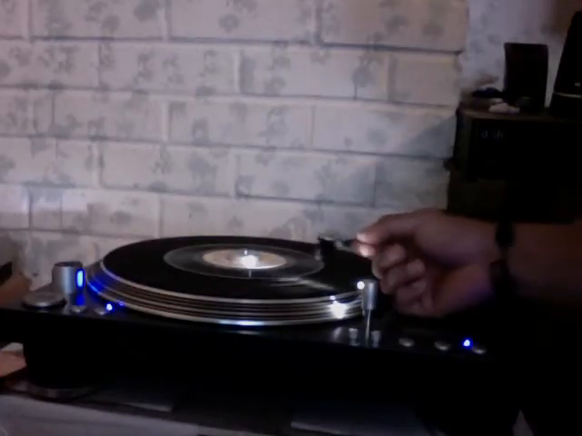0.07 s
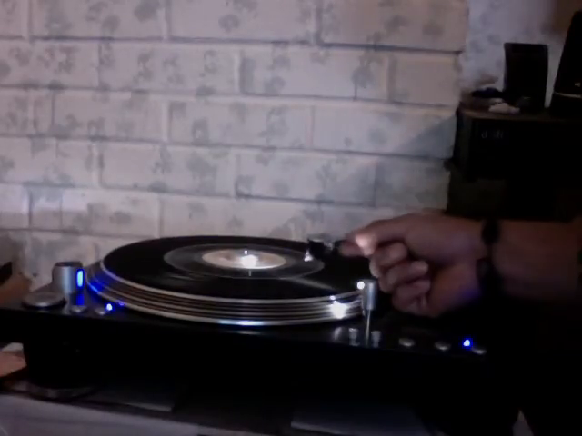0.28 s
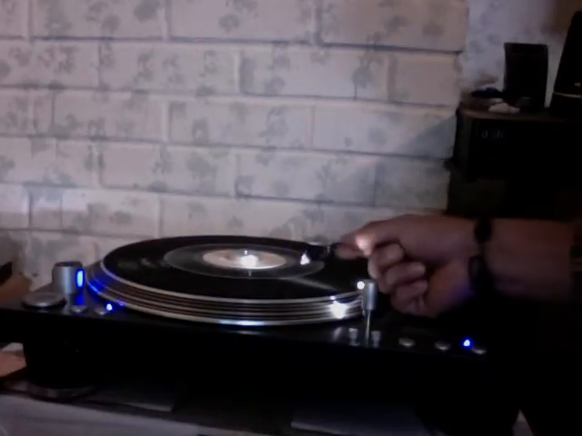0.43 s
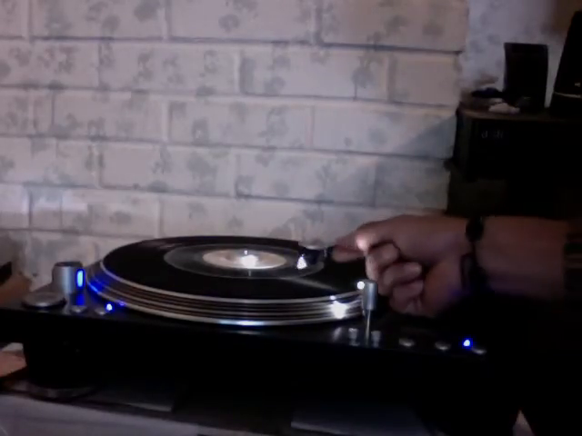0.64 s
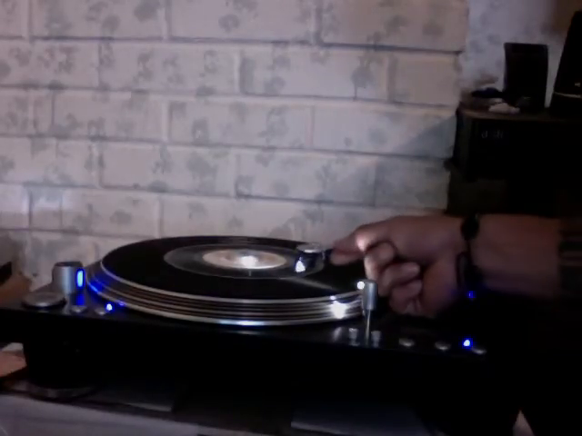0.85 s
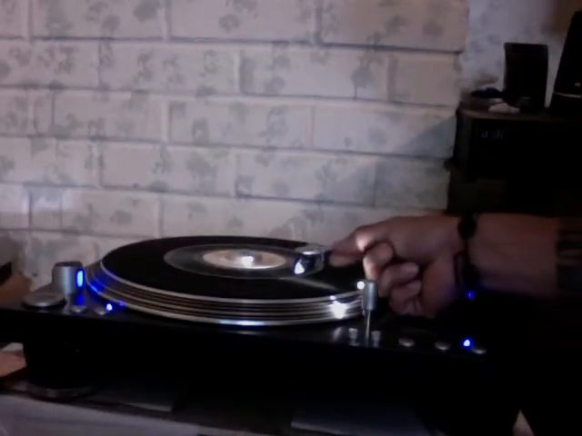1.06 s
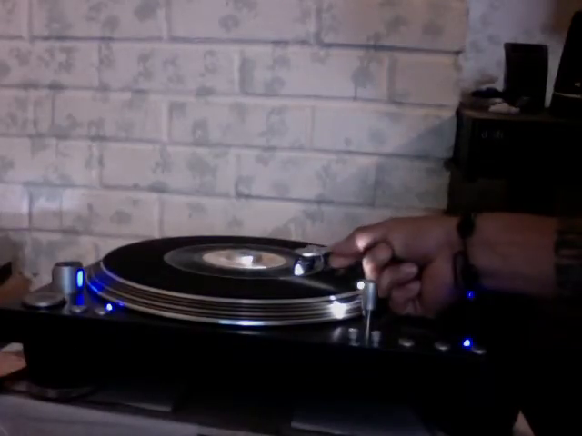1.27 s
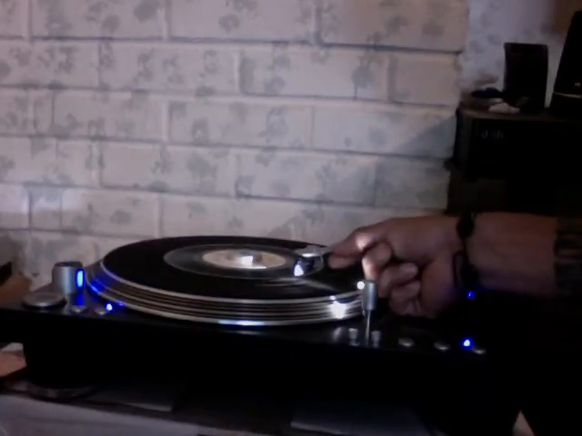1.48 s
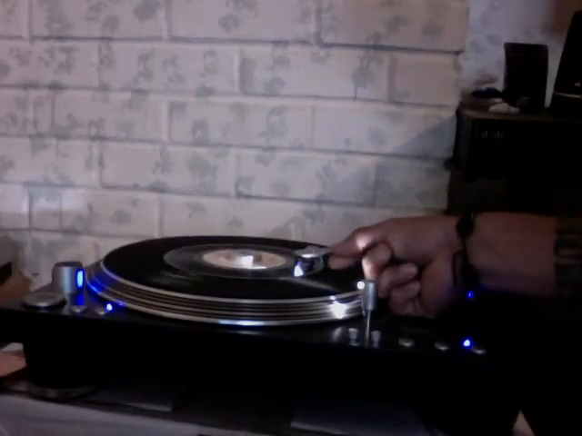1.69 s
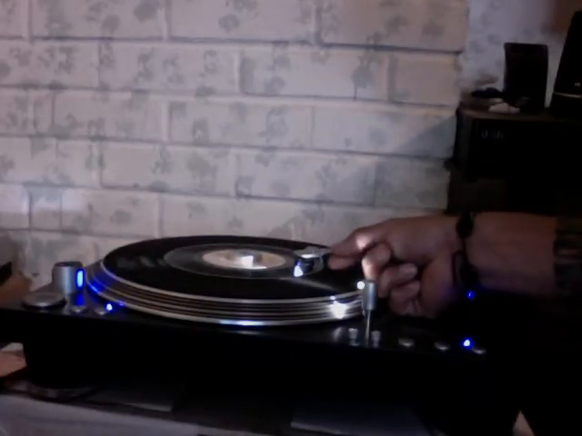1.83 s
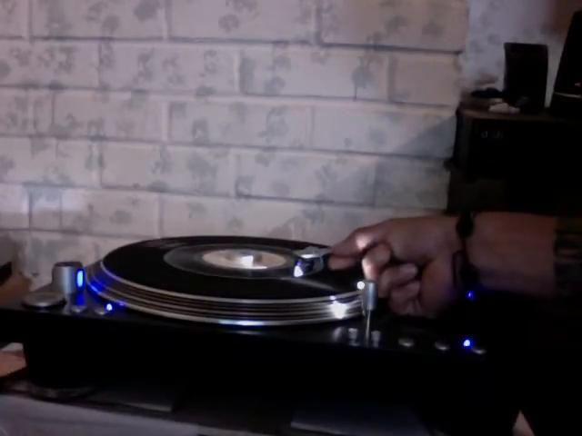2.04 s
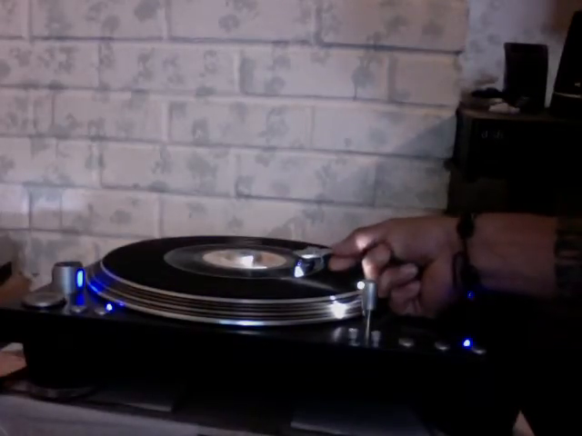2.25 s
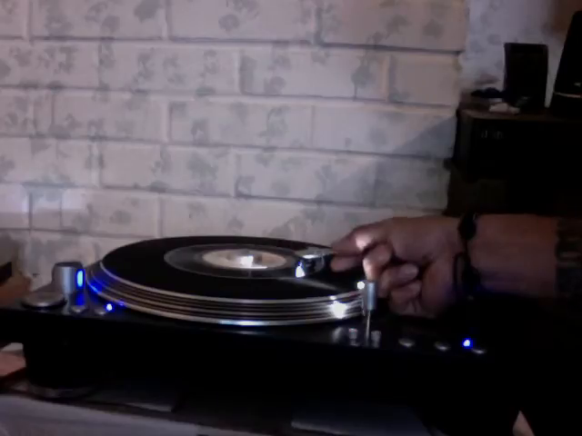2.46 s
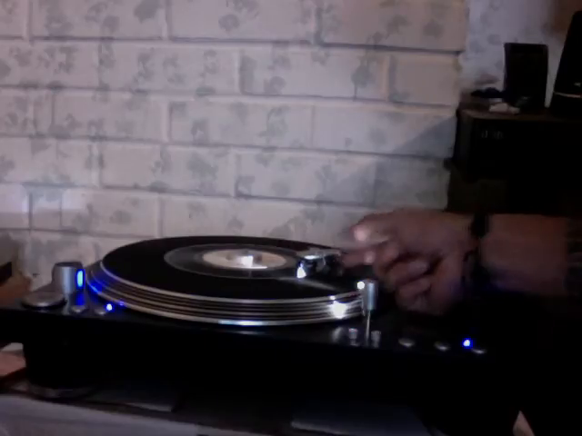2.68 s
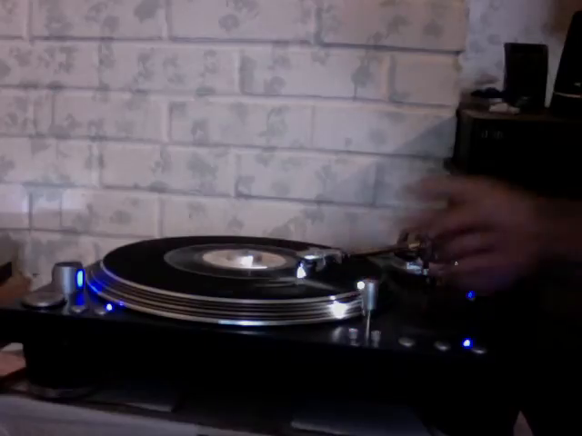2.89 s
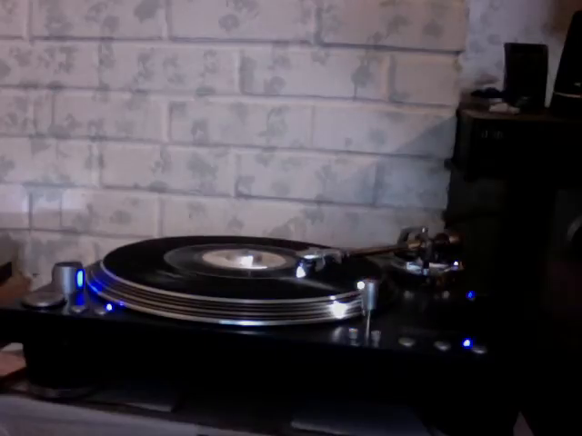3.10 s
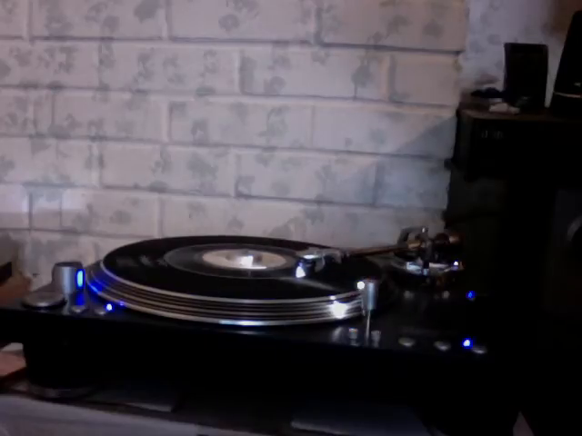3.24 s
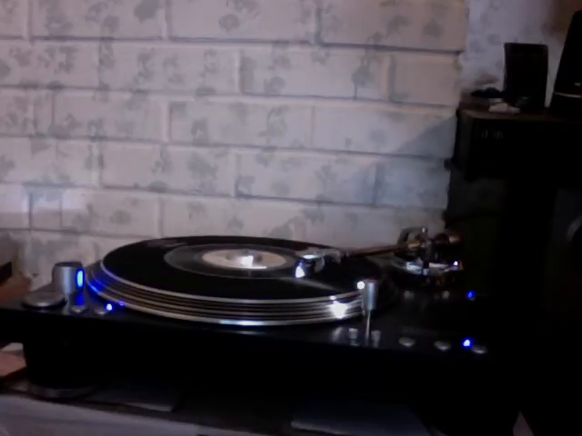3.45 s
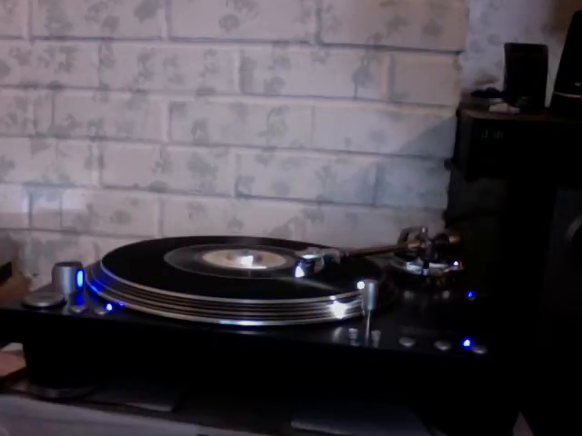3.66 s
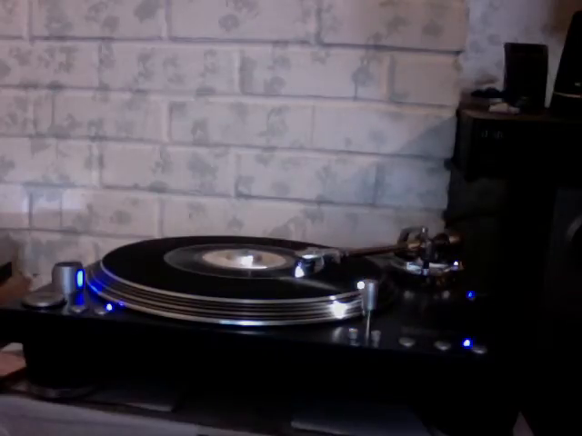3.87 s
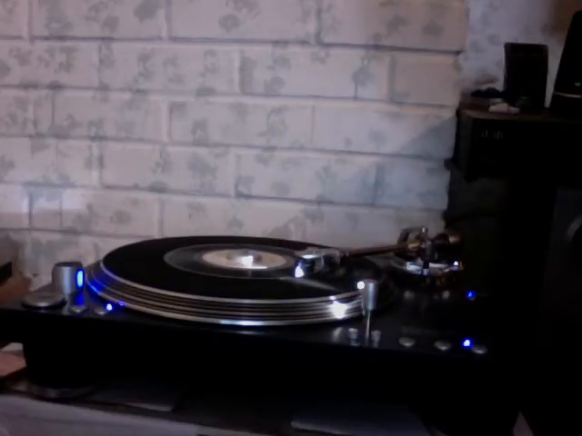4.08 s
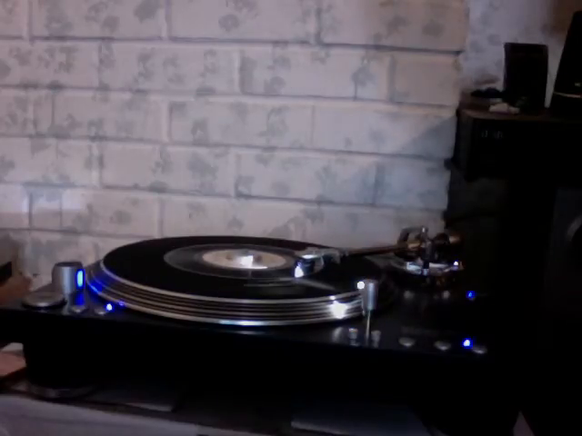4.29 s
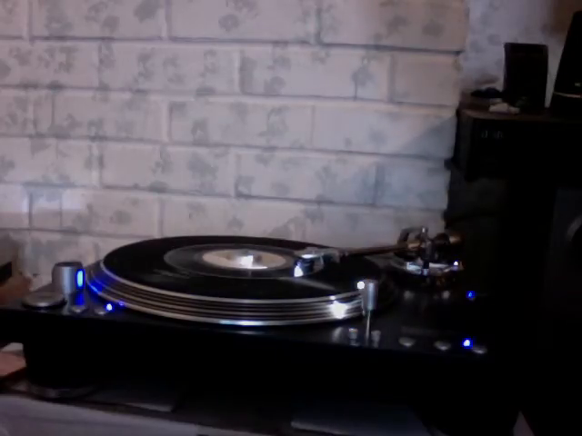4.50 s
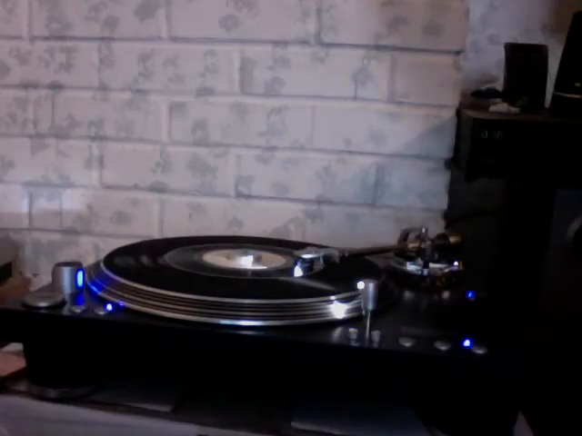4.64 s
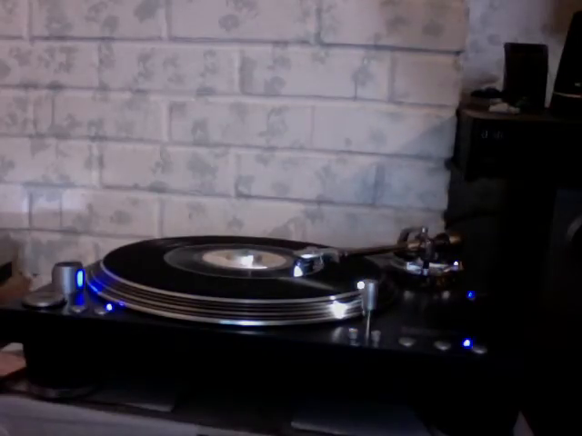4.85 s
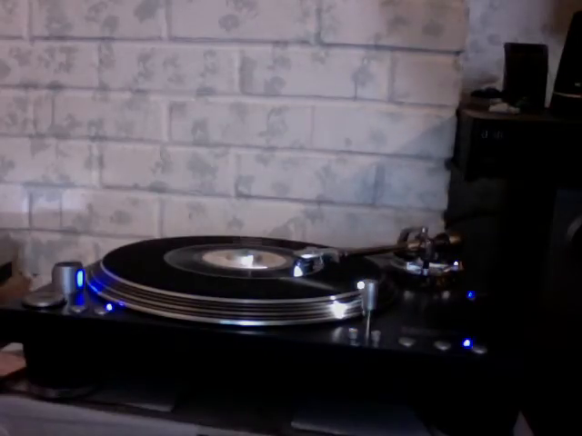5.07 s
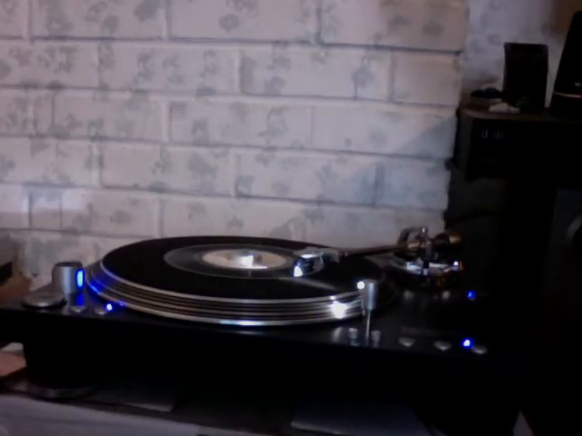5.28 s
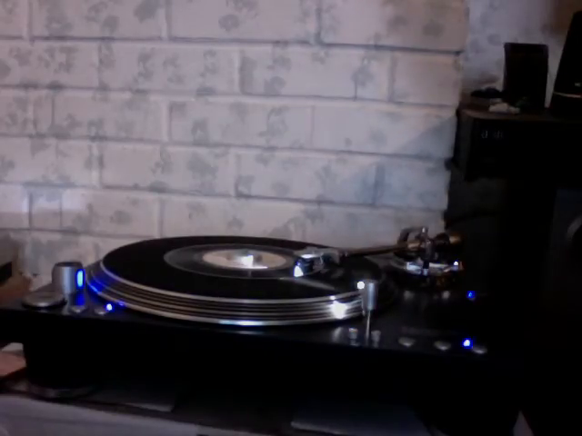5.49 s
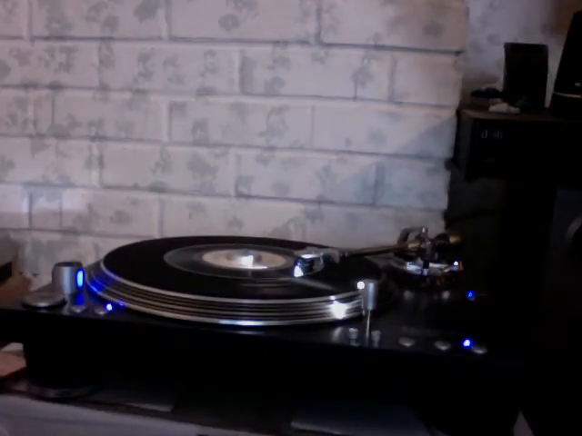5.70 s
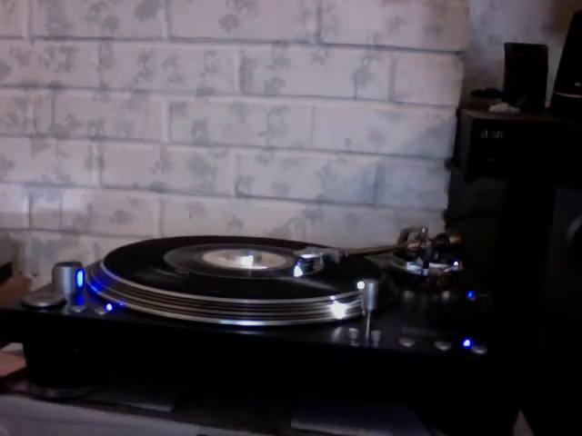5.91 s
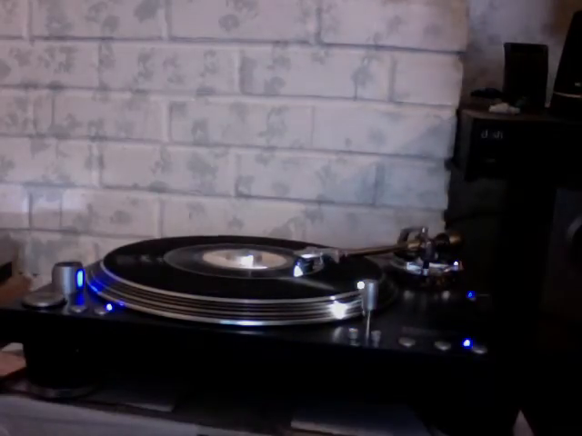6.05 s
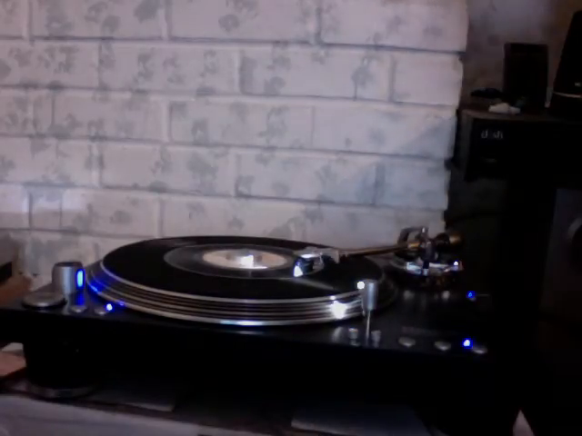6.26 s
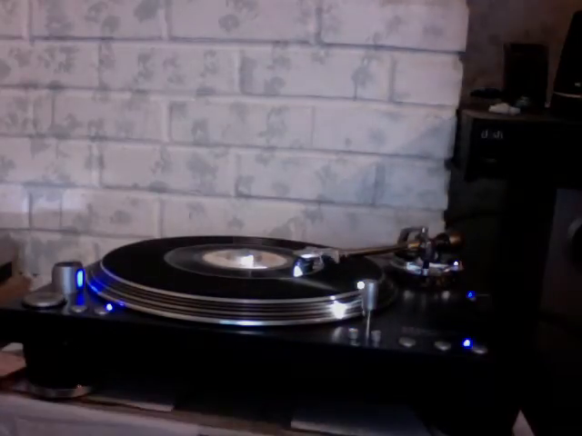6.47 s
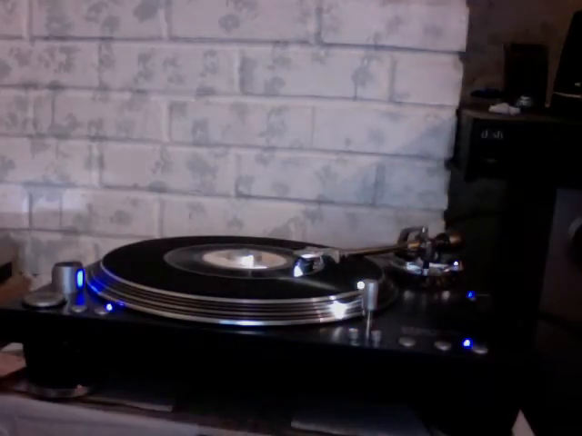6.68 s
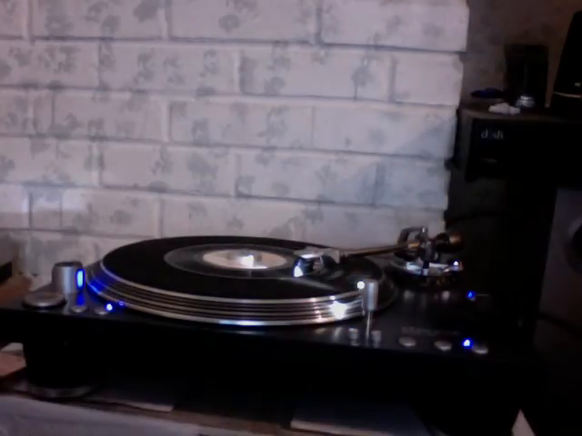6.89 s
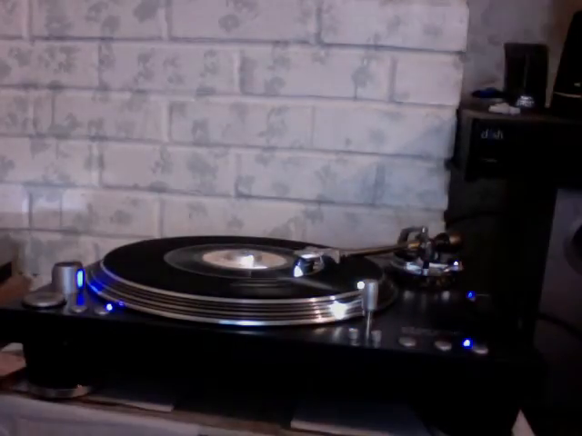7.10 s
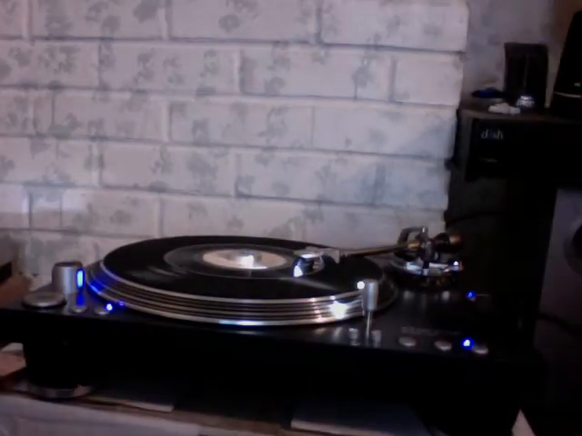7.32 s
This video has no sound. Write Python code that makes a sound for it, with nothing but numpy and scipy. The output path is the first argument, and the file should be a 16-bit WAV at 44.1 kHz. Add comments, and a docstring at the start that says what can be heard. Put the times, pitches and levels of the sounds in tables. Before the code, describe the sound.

A direct, dry pickup of a record player, nearly all in the left channel, with only a thin, bright trace of the pops on the right. From 0 to 1.7 s there is just faint 60 Hz hum, slight buzz and soft hiss, with tiny dips near 1.0, 1.3 and 1.45 s. At about 1.73 s the stylus touches dusty spinning vinyl: crackle and ticks, a heavy thump at 1.86, a harder one at 2.3, and a duller knock at 2.63 s. Loud, sharp pops crowd 2.6-2.8 and 3.05-3.2 s. After 3.3 s crackle thins over dull surface noise and deep rumble that swells with each 1.4-second turn. Strong isolated pops strike around 4.47, 4.66, 5.58 and 5.71 s; then lighter, sparse clicks continue. From 6.5 s a faint low groove hum joins until the end at 7.3 s.

```python
"""At a record player: a stylus is lowered by hand onto a dusty spinning record, wired into a recorder's left input.
Grains and pits kick the stylus, which makes the pops and crackle; wide pushes on a springy arm make thumps and knocks.
The vinyl rumbles and hisses as filtered noise, with a low hum of sines cut in the groove.
Below lie the hum, buzz and hiss of the phono stage; a trace of it all leaks into the right input."""
import sys
import numpy as np
from scipy import signal
from scipy.fft import rfft, irfft, next_fast_len
from scipy.io import wavfile

SR = 44100
rng = np.random.default_rng(int(sys.argv[2]) if len(sys.argv) > 2 else 0)


def inscribe(sig):
    """Save sig as 16-bit PCM at rate SR to the path in sys.argv[1].

    A 1-D sig is mono; a 2-D sig holds one channel per row.
    Samples are clipped to [-1, 1] before scaling.
    """
    pcm = np.round(np.clip(np.atleast_2d(sig).T, -1, 1) * 32767)
    wavfile.write(sys.argv[1], SR, pcm.astype(np.int16))


N = 323584   # length in samples

# All levels below are those ahead of the recorder's input gain.
# Loud pops where a grain pushes the stylus out.
# Each row: time in seconds, peak in dB, push in ms, slip back in ms.
GRAIN_POPS = [(1.7457, -12.5, 0.32, 0.056), (1.758, -26, 0.12, 0.11), (1.7742, -21, 0.065, 0.024),
              (1.811, -23, 0.041, 0.34), (1.8207, -10.5, 0.035, 0.13), (1.825, -17, 0.077, 0.03),
              (1.8334, -16, 0.065, 0.082), (1.8367, -20, 0.036, 0.13), (1.8664, -5.5, 0.058, 0.067),
              (1.901, -17.5, 0.043, 0.027), (1.936, -19, 0.019, 0.013), (1.994, -12.5, 0.026, 0.091),
              (2.067, -12.5, 0.034, 0.024), (2.1044, -17.5, 0.03, 0.02), (2.3937, -17, 0.027, 0.094),
              (2.4697, -16.5, 0.021, 0.048), (2.4692, -15.5, 0.027, 0.12), (2.4715, -11.5, 0.054, 0.061),
              (2.6153, -6, 0.036, 0.061), (2.6277, -12, 0.39, 0.4), (2.6463, -5, 0.077, 0.068),
              (2.679, -12.5, 0.081, 0.027), (2.6863, -14, 0.066, 0.074), (2.7218, -8.5, 0.054, 0.051),
              (2.725, -15, 0.09, 0.03), (2.779, -17, 0.073, 0.058), (2.7891, -8, 0.067, 0.081),
              (2.7933, -5, 0.17, 0.42), (2.7949, -6, 0.052, 0.096), (2.7963, -8, 0.07, 0.042),
              (2.8013, -12, 0.065, 0.35), (2.807, -7, 0.043, 0.18), (2.8576, -15.5, 0.09, 0.078),
              (2.885, -22.5, 0.3, 0.1), (2.9039, -20.5, 0.18, 0.044), (3.0132, -16, 0.13, 0.09),
              (3.0491, -10, 0.2, 0.05), (3.0647, -13.5, 0.055, 0.19), (3.0802, -20, 0.065, 0.067),
              (3.081, -14, 0.11, 0.066), (3.096, -11.5, 0.094, 0.094), (3.1007, -14.5, 0.12, 0.065),
              (3.1235, -7.5, 0.076, 0.19), (3.1366, -12.5, 0.061, 0.016), (3.1549, -10.5, 0.07, 0.18),
              (3.178, -2.5, 0.17, 0.12), (3.1837, -10, 0.21, 0.017), (3.1877, -7.5, 0.021, 0.16),
              (3.194, -10, 0.51, 0.039), (3.2106, -12.5, 0.067, 0.51), (3.2113, -10.5, 0.077, 0.11),
              (3.2312, -18, 0.15, 0.065), (3.286, -20, 0.11, 0.19), (3.2917, -19, 0.24, 0.18),
              (3.3005, -17.5, 0.095, 0.12), (3.3164, -16.5, 0.28, 0.099), (3.3228, -16.5, 0.46, 0.16),
              (3.369, -21.5, 0.24, 0.13), (3.3792, -20, 0.47, 0.044), (3.4519, -19, 0.52, 0.35),
              (3.4596, -18.5, 0.14, 0.12), (3.6059, -16.5, 0.087, 0.081), (3.6116, -19, 0.22, 0.099),
              (3.628, -17, 0.099, 0.14), (3.817, -23, 0.15, 0.048), (3.8229, -21, 0.087, 0.09),
              (3.8648, -24, 0.2, 0.34), (3.9133, -11, 0.053, 0.012), (4.2005, -15, 0.12, 0.097),
              (4.2438, -25, 0.13, 0.037), (4.3488, -24.5, 0.09, 0.099), (4.4743, -3.5, 0.28, 0.063),
              (4.489, -25, 0.098, 0.18), (4.5202, -8.5, 0.08, 0.13), (4.5274, -9, 0.12, 0.13),
              (4.612, -10.5, 0.1, 0.15), (4.625, -21, 0.36, 0.05), (4.6289, -19.5, 0.046, 0.12),
              (4.634, -21, 0.09, 0.09), (4.6588, -12, 0.19, 0.13), (4.6599, -3.5, 0.24, 0.14),
              (4.6614, -20, 0.12, 0.069), (4.6652, -11.5, 0.064, 0.15), (4.6734, -12.5, 0.1, 0.053),
              (4.7223, -12.5, 0.11, 0.12), (4.8113, -23, 0.095, 0.095), (4.8627, -20, 0.16, 0.15),
              (4.9583, -29, 0.12, 0.047), (5.0044, -30.5, 0.24, 0.28), (5.2053, -27, 0.085, 0.053),
              (5.2273, -23.5, 0.22, 0.27), (5.2474, -27.5, 0.23, 0.21), (5.3065, -18, 0.25, 0.13),
              (5.3085, -13, 0.22, 0.13), (5.3198, -14.5, 0.062, 0.18), (5.322, -26, 0.099, 0.21),
              (5.4037, -11.5, 0.25, 0.1), (5.4304, -19.5, 0.21, 0.067), (5.4505, -17, 0.15, 0.05),
              (5.5323, -15, 0.077, 0.04), (5.579, -19.5, 0.2, 0.086), (5.5828, -0.5, 0.13, 0.15),
              (5.636, -28, 0.066, 0.044), (5.7087, -8, 0.055, 0.15), (5.7092, -9, 0.17, 0.14),
              (5.7827, -24.5, 0.18, 0.028), (5.8064, -26.5, 0.17, 0.22), (5.8476, -29.5, 0.84, 0.18),
              (5.869, -32.5, 0.15, 0.078), (5.896, -27, 0.16, 0.11), (5.912, -16, 0.11, 0.085),
              (5.9569, -18.5, 0.17, 0.21), (5.9732, -15.5, 0.063, 0.042), (5.9928, -17, 0.12, 0.35),
              (6.0083, -13, 0.24, 0.099), (6.026, -25, 0.097, 0.07), (6.0564, -20.5, 0.07, 0.082),
              (6.0592, -20.5, 0.11, 0.057), (6.2127, -14.5, 0.25, 0.069), (6.242, -32, 0.07, 0.05),
              (6.3191, -29.5, 0.12, 0.092), (6.4576, -13.5, 0.14, 0.31), (6.5363, -23, 0.045, 0.21),
              (6.711, -35, 0.097, 0.061), (6.7379, -25.5, 0.14, 0.073), (6.831, -34, 0.073, 0.032),
              (6.8695, -29.5, 0.16, 0.21), (6.891, -32, 0.19, 0.14), (6.961, -14, 0.11, 0.063),
              (6.965, -16, 0.33, 0.044), (6.9861, -26, 0.35, 0.02), (7.032, -23, 0.17, 0.038),
              (7.1835, -21.5, 0.12, 0.44), (7.2078, -31, 0.1, 0.12), (7.2463, -11.5, 0.21, 0.077),
              (7.2546, -23.5, 0.2, 0.11), (7.2628, -22, 0.27, 0.073), (7.3043, -29.5, 0.14, 0.082)]
# Loud pops where a pit lets the stylus drop in.
# Each row: time in seconds, peak in dB, push in ms, slip back in ms.
PIT_POPS = [(1.7288, -14.5, 0.058, 0.075), (1.7427, -13.5, 0.024, 0.13), (1.7474, -21, 0.35, 0.036),
            (1.8663, -9, 0.028, 0.015), (1.8663, -11, 0.13, 0.089), (1.9468, -12.5, 0.13, 0.08),
            (1.969, -18.5, 0.17, 0.019), (2.0415, -7.5, 0.027, 0.093), (2.218, -10.5, 0.013, 0.12),
            (2.238, -17, 0.019, 0.017), (2.2523, -12, 0.053, 0.081), (2.4944, -10, 0.057, 0.051),
            (2.5853, -11, 0.052, 0.03), (2.5978, -10, 0.03, 0.02), (2.6089, -3, 0.038, 0.016),
            (2.6244, -8, 0.024, 0.029), (2.6525, -9.5, 0.076, 0.09), (2.7174, -14, 0.15, 0.069),
            (2.9369, -18, 0.15, 0.084), (3.023, -15.5, 0.11, 0.16), (4.791, -25, 0.043, 0.28)]
GRAIN_REBOUND, PIT_REBOUND = 0.6, 0.26   # share of the push that springs back fast
PUSH_EDGE = 2.4   # the higher, the flatter the top and the steeper the sides of a push
ROUGH_SHARE, ROUGH_HZ = 0.11, 3510   # uneven faces of grains and pits: share of the push, finest ripple
SPRING_HZ, CREEP_HZ, TIP_HZ = 900, 124, 19000   # fast return, slow return, limit of the tip

# How thick the fine dust lies under the stylus. Each row: time in seconds, thickness as a level in dB.
DUST_THICKNESS = [(1.7, -47.5), (1.74, -45.5), (1.88, -41.5), (2.26, -46), (2.55, -42), (2.7, -40),
                  (2.94, -44), (3.16, -39), (3.35, -46.5), (3.5, -52.5), (3.65, -48), (3.94, -52.5),
                  (4.2, -58), (4.42, -48.5), (4.75, -50.5), (5.0, -62.5), (5.67, -50.5), (5.86, -49),
                  (6.28, -56.5), (7.12, -53), (7.34, -51)]
# Scuffed patches, a short dense crackle each.
# Each row: middle in seconds, length in seconds, thickness as a level in dB.
SCUFFED_PATCHES = [(1.739, 0.024, -52), (1.828, 0.0282, -41), (2.286, 0.025, -41), (2.614, 0.096, -43.5),
                   (2.724, 0.0127, -32.5), (2.796, 0.038, -29.5), (2.935, 0.02, -40.5), (3.008, 0.045, -43),
                   (3.111, 0.011, -47), (3.129, 0.013, -27.5), (3.189, 0.024, -34), (3.439, 0.029, -40.5),
                   (3.587, 0.0099, -45.5), (3.625, 0.0595, -42.5), (4.202, 0.019, -44), (4.401, 0.015, -50),
                   (4.526, 0.014, -40), (4.766, 0.012, -47), (5.581, 0.016, -40), (6.013, 0.025, -45.5),
                   (6.981, 0.014, -40.5), (7.184, 0.024, -42)]

# Thumps and knocks of the arm, with their swings back.
# Each row: time in seconds, peak in dB, rise of the push in ms, fall of the push in ms, direction (1 or -1).
ARM_KNOCKS = [(1.745, -16.5, 0.39, 0.85, -1), (1.8575, -8, 1.6, 0.93, -1), (1.862, -15.5, 1.9, 20, 1),
              (2.2746, -12.5, 0.41, 0.76, -1), (2.278, -10.5, 2.9, 7.3, 1), (2.2955, -3, 1.23, 1.96, -1),
              (2.303, -8.5, 2.9, 21, 1), (2.6293, -12, 2.3, 4.8, 1), (2.664, -24, 3, 3.5, -1),
              (2.674, -16, 4.2, 19, 1), (3.194, -16, 0.56, 5, 1), (3.38, -23.5, 0.25, 11, 1),
              (3.4527, -23, 0.3, 4.6, 1), (3.582, -22, 1.1, 1, -1), (4.5367, -14, 0.11, 0.87, -1)]
ARM_HZ, ARM_WIDTH_HZ = 24.4, 43   # resonance of the arm and its width

# Rumble of disc and arm between swells. Each row: time in seconds, level in dB.
RUMBLE_LEVEL = [(1.69, -67), (1.71, -51), (3.6, -39.5), (6.8, -43), (7.34, -30.5)]
# Spectrum of the rumble. Each row: frequency in Hz, relative level in dB per Hz.
RUMBLE_SPECTRUM = [(8, 13), (14, 20), (22, 27), (40, 9.5), (70, -5), (120, -51)]
# Swells of the rumble, repeated on every turn of the slightly warped disc.
# Each row: time of a pass in seconds, rise in dB.
WARP_SWELLS = [(2.92, 8.5), (3.39, 11), (3.83, 10.7)]
TURN_S, SWELL_S = 1.394, 0.097   # one turn; half width of a swell
# The hand shakes the arm, and the shaking dies away.
# Each row: time in seconds, level in dB, decay in dB per second.
ARM_SHAKES = [(1.87, -25.5, 166), (2.312, -22, 112), (2.7, -22, 54)]
SHAKE_RISE_S = 0.11   # the shaking builds up over this long before its time

# Vinyl sliding under the tip. Each row: time in seconds, level in dB.
SLIDE_LEVEL = [(1.69, -69), (1.715, -43), (2.9, -39), (6.0, -42), (7.34, -41)]
# Spectrum of the sliding vinyl. Each row: frequency in Hz, relative level in dB per Hz.
SURFACE_SPECTRUM = [(30, -3.5), (55, 0.5), (110, -8.5), (230, -14.5), (560, -22.5), (1600, -32),
                    (4000, -53.5), (9000, -81)]
# A low hum cut in the groove. Each row: time in seconds, gain in dB.
GROOVE_HUM_GAIN = [(6.5, -76), (6.58, -37.5), (6.95, -38), (7.1, -42), (7.34, -43)]
# Partials of the groove hum. Each row: frequency in Hz, level in dB ahead of that gain.
GROOVE_PARTIALS = [(57.8, 2.5), (116, -13)]

# Steady tones of the electronics. Each row: frequency in Hz, rms level in dB outside the dips.
HUM_TONES = [(60, -61), (120, -76), (135, -82), (180, -80), (270, -85), (300, -86), (540, -86),
             (689.1, -84), (1378.2, -85), (2067.3, -89), (2756.4, -89)]
# Spectrum of the electronic hiss. Each row: frequency in Hz, relative level in dB per Hz.
HISS_SPECTRUM = [(20, 13), (60, 5), (200, 3), (700, 1), (2000, -1.5), (16000, -2.5)]
HISS_DB = -66   # rms outside the dips
# The level of the electronics dips briefly.
# Each row: middle in seconds, depth for the hiss in dB, half width in seconds.
LEVEL_DIPS = [(0.952, 4, .02), (1.306, 10.5, 0.025), (1.443, 15, 0.056)]
# Rectifier buzz: mains frequency, gain of the ring, its pitch, its fall by 60 dB, lateness of every second spike
MAINS_HZ = 60
BUZZ_DB, BUZZ_HZ, BUZZ_T60_S, BUZZ_LATE_MS = -50, 5560, 0.00041, 0.12

CUTOFF_HZ = 16400   # top of the recorder


def pops():
    """Grains and pits push the stylus opposite ways, and grains spring back harder."""
    pit_pops = kicks(*np.transpose(PIT_POPS), PIT_REBOUND)
    grain_pops = kicks(*np.transpose(GRAIN_POPS), GRAIN_REBOUND)
    return pit_pops - grain_pops


def kicks(times_s, peak_db, push_ms, slip_ms, rebound):
    """The tip is pushed aside and slips free; the suspension springs back fast (share: rebound), then creeps home."""
    push = bumps(np.maximum(push_ms, 0.015), np.maximum(slip_ms, 0.012), size=360, edge=PUSH_EDGE)
    ripple = rms_one(twice_low(rng.standard_normal(push.shape), ROUGH_HZ))
    push = push * (1 + ROUGH_SHARE * ripple)
    share = np.clip(rebound, 0, 1)
    fast = share * one_pole(push, SPRING_HZ, "high")
    slow = (1 - share) * one_pole(push, CREEP_HZ, "high")
    return place(one_pole(fast + slow, TIP_HZ, "low"), times_s, from_db(peak_db))


def dust():
    """Many small random grains and pits; where dust is thick or the vinyl scuffed they come larger and more often."""
    t = np.arange(N) / SR
    scuffs = sum(from_db(db) * np.exp(-(1.496 * (t - s) / length) ** 4) for s, length, db in SCUFFED_PATCHES)
    # dust lies in clumps with clean gaps
    clumps = rms_one(twice_low(rng.standard_normal(N), 25))
    thick = (level(DUST_THICKNESS) + scuffs) * from_db(2.6 * clumps)

    # one row of random numbers for each speck that may be met
    draws = rng.random((12000, 6))
    at = (draws[:, 0] * N).astype(int)
    thick_here = thick[at]
    # a few specks are much larger
    size_db = 20 * np.log10(thick_here) - 4.08 * np.log(np.maximum(draws[:, 1], 0.04)) + 1.5
    # specks are narrower where the crackle is thick
    width_ms = 0.018 * 11.0 ** draws[:, 2] * (thick_here / from_db(-35.5)) ** -0.36
    width_ms = np.minimum(width_ms, 0.7)
    slip_ms = width_ms * (0.22 + 0.85 * draws[:, 5])
    met = draws[:, 3] < (thick_here / from_db(-36)) ** 0.55
    is_grain = draws[:, 4] > 0.35
    grain, pit = met & is_grain, met & ~is_grain
    crackle = kicks(t[at][pit], size_db[pit], width_ms[pit], slip_ms[pit], rebound=0.22)
    crackle -= kicks(t[at][grain], size_db[grain], width_ms[grain], slip_ms[grain], rebound=0.16)

    # a soft noise under the single specks
    grit = rms_one(one_pole(twice_low(rng.standard_normal(N), 1140), 370, "high"))
    grit_gain = from_db(-11.0) * level(DUST_THICKNESS) * from_db(2.2 * clumps)
    return crackle + grit_gain * grit


def arm_knocks():
    """Thumps and knocks: a wide push either way, shaped by the resonance of the arm on its suspension."""
    times, peak_db, rise_ms, fall_ms, direction = np.transpose(ARM_KNOCKS)
    w = 2 * np.pi * ARM_HZ
    b, a = signal.bilinear([1, 0, 0], [1, 2 * np.pi * ARM_WIDTH_HZ, w * w], SR)
    push = bumps(rise_ms, fall_ms, size=8000, edge=1.9)
    return place(signal.lfilter(b, a, push), times, np.sign(direction) * from_db(peak_db))


def rumble():
    """Low noise that swells with the turning disc and jumps when the hand shakes the arm."""
    t = np.arange(N) / SR
    swell_db = np.zeros(N)
    for s, rise_db in WARP_SWELLS:
        from_pass_s = (t - s + TURN_S / 2) % TURN_S - TURN_S / 2   # time to the nearest pass
        swell_db += rise_db * np.exp(-(from_pass_s / SWELL_S) ** 2)
    shaking = np.zeros(N)
    for s, db, fall_db in ARM_SHAKES:
        build_up = np.clip(1 + (t - s) / SHAKE_RISE_S, 0, 1) ** 2
        shaking += from_db(db - fall_db * np.maximum(t - s, 0)) * build_up
    return (level(RUMBLE_LEVEL) * from_db(swell_db) + shaking) * coloured(RUMBLE_SPECTRUM)


def surface():
    """Vinyl sliding under the tip rubs it at random, heard as noise that is strongest in the bass."""
    return level(SLIDE_LEVEL) * coloured(SURFACE_SPECTRUM)


def groove_hum():
    """A low hum cut in the groove moves the stylus as two steady sines."""
    return level(GROOVE_HUM_GAIN) * tones(GROOVE_PARTIALS)


def electronics():
    """Hum, buzz and hiss of the phono stage, with short dips."""
    t = np.arange(N) / SR
    dip_db = sum(depth_db * np.exp(-np.abs((t - s) / width) ** 2.2) for s, depth_db, width in LEVEL_DIPS)
    hum_and_buzz = tones(HUM_TONES) + buzz()
    hiss = from_db(HISS_DB) * coloured(HISS_SPECTRUM)
    # hum and buzz dip deeper than the hiss
    return from_db(-1.6 * dip_db) * hum_and_buzz + from_db(-dip_db) * hiss


def buzz():
    """Rectifier spikes ring shortly twice a mains cycle; every second one is inverted and a little late."""
    half = np.arange(int(2 * MAINS_HZ * N / SR))
    late_s = half % 2 * BUZZ_LATE_MS / 1000
    clicks = np.zeros(N + SR)
    clicks[((half / (2 * MAINS_HZ) + late_s) * SR).astype(int)] = (-1.0) ** half
    r = from_db(-60 / (BUZZ_T60_S * SR))   # what is left of the ring after one sample
    w = 2 * np.pi * BUZZ_HZ / SR
    ring = signal.lfilter([1, -1], [1, -2 * r * np.cos(w), r * r], clicks[:N] + 1e-18)
    return from_db(BUZZ_DB) * ring


def tones(rows):
    """Steady sines from rows (Hz, dB rms), each with a random phase."""
    t = np.arange(N) / SR
    phases = rng.uniform(0, 2 * np.pi, len(rows))
    return sum(np.sqrt(2) * from_db(db) * np.sin(2 * np.pi * hz * t + p) for (hz, db), p in zip(rows, phases))


def coloured(spectrum):
    """Noise with the given spectrum, rms 1."""
    size = next_fast_len(N)
    hz, db = np.transpose(spectrum)
    log_hz = np.log(np.arange(1, size // 2 + 2) * SR / size)
    gain = from_db(np.interp(log_hz, np.log(hz), db))
    white = rfft(rng.standard_normal(size))
    return rms_one(irfft(white * gain, size)[:N])


def bumps(rise_ms, fall_ms, size, edge):
    """Rows of bumps, each side with its own time."""
    t_ms = np.arange(size) / SR * 1000 - 2.5 * np.max(rise_ms)
    side_ms = np.where(t_ms > 0, fall_ms[:, None], rise_ms[:, None])
    return np.exp(-np.abs(t_ms / side_ms) ** edge)


def place(shapes, times_s, gains):
    """Add each shape, scaled to its peak, with its top at its time."""
    size = shapes.shape[1]
    out = np.zeros(N + 2 * size)
    start = np.maximum(np.round(times_s * SR).astype(int) - np.argmax(shapes, axis=1), 0)
    shapes = shapes * (gains / shapes.max(axis=1))[:, None]
    np.add.at(out, start[:, None] + np.arange(size), shapes)
    return out[:N]


def level(rows):
    """Gain over time from rows (seconds, dB); silent before the first row."""
    s, db = np.transpose(rows)
    return from_db(np.interp(np.arange(N) / SR, s, db, left=-200))


def one_pole(x, hz, kind):
    """Gentle first-order low- or high-pass along the last axis."""
    return signal.lfilter(*signal.butter(1, min(hz, 0.45 * SR), kind, fs=SR), x)


def twice_low(x, hz):
    """The gentle low-pass, two times over."""
    return one_pole(one_pole(x, hz, "low"), hz, "low")


def from_db(db):
    """Decibels to gain."""
    return 10 ** (np.asarray(db) / 20)


def rms_one(x):
    """Scale to rms 1."""
    return x / np.sqrt(np.mean(x ** 2) + 1e-20)


def scene():
    """The record player feeds the left wire; the right one is idle."""
    vinyl = rumble() + surface() + groove_hum()
    left = pops() + dust() + arm_knocks() + vinyl + electronics()
    return np.array([left, np.zeros(N)])


def record(dry):
    """Input gain, hard overload, a leak into the right input that grows with pitch, the top cut."""
    left = np.clip(from_db(6.0) * dry[0], -1, 1)
    low_leak = from_db(-59) * one_pole(left, 70, "low")
    high_leak = from_db(-27) * one_pole(left, 14000, "high")
    right_hiss = from_db(-91) * rng.standard_normal(N)
    both = np.array([left, dry[1] + low_leak + high_leak + right_hiss])
    top_cut = signal.cheby2(16, 60, CUTOFF_HZ, fs=SR, output="sos")
    return np.clip(signal.sosfilt(top_cut, both), -1, 1)


dry = scene()
out = record(dry)
inscribe(out)
```